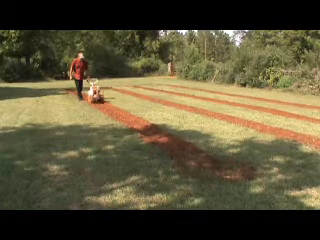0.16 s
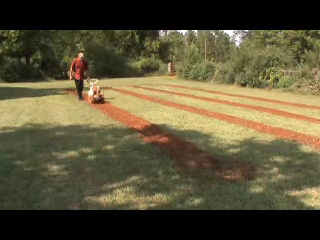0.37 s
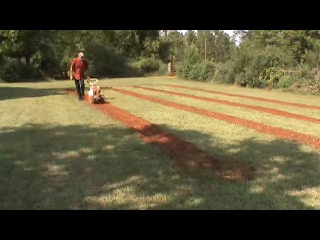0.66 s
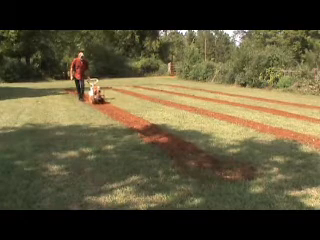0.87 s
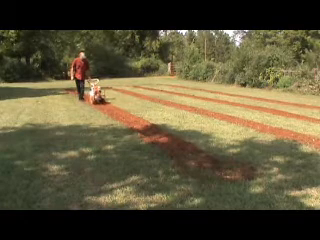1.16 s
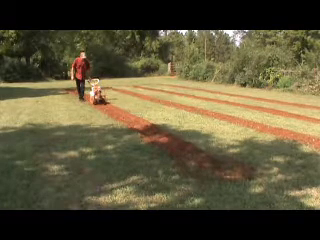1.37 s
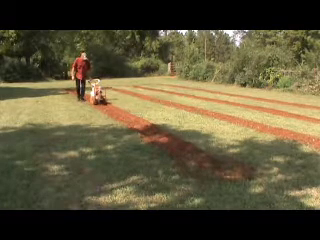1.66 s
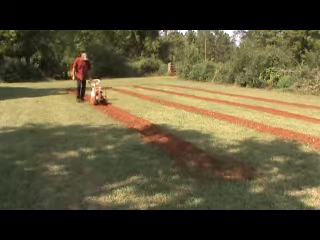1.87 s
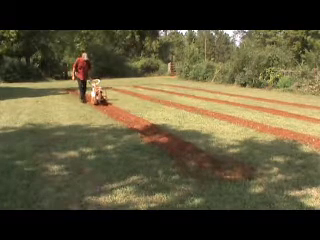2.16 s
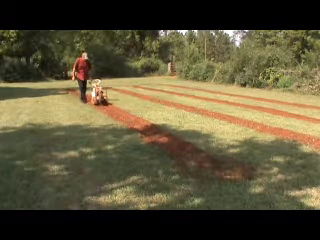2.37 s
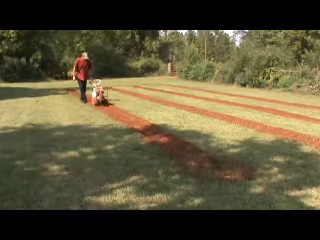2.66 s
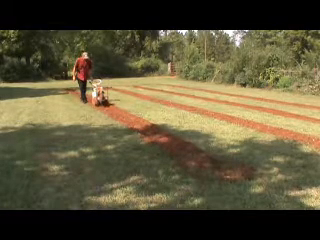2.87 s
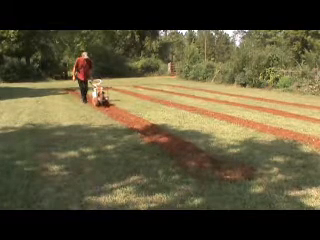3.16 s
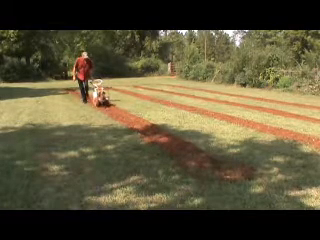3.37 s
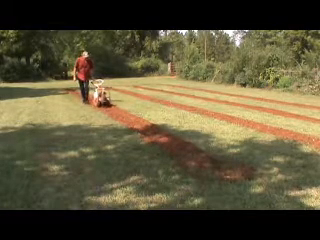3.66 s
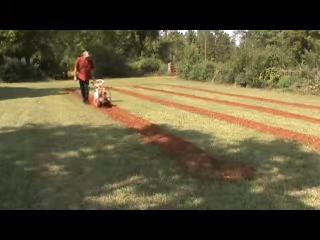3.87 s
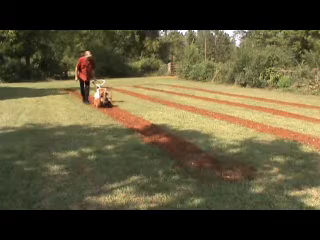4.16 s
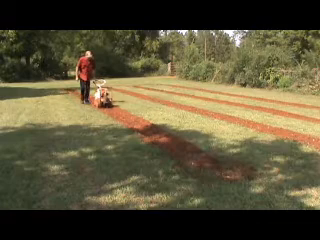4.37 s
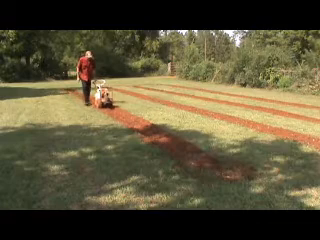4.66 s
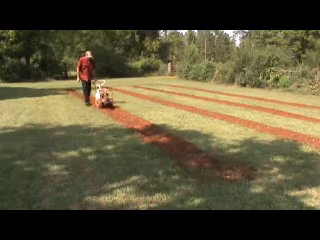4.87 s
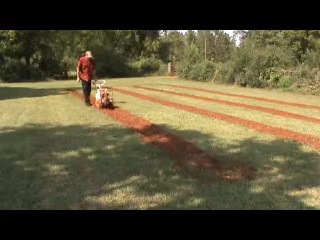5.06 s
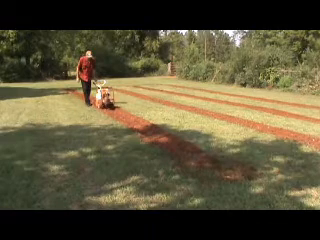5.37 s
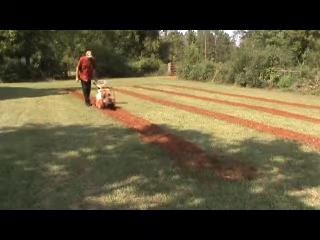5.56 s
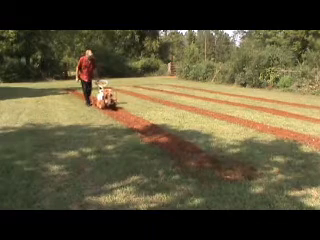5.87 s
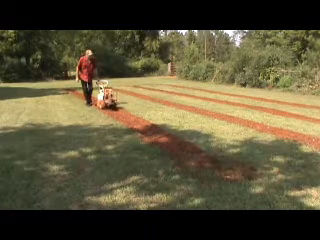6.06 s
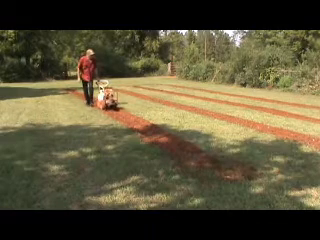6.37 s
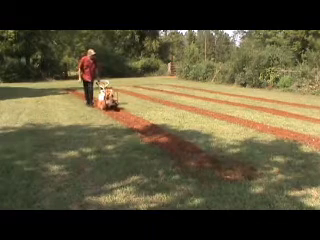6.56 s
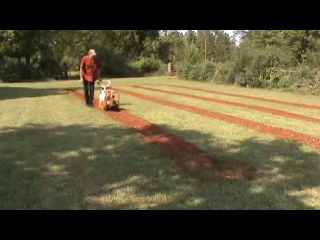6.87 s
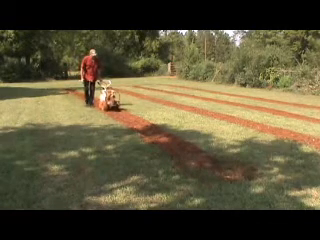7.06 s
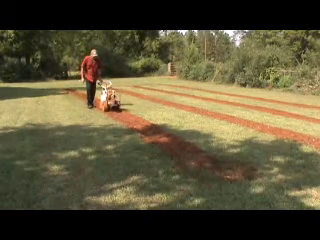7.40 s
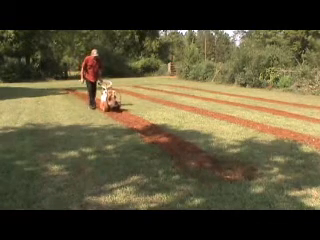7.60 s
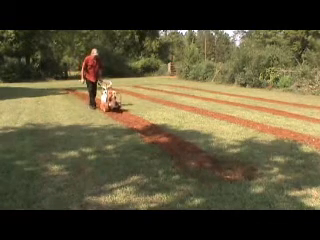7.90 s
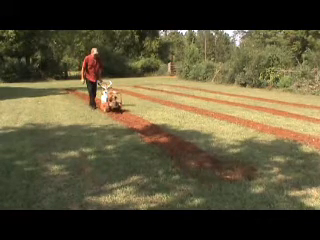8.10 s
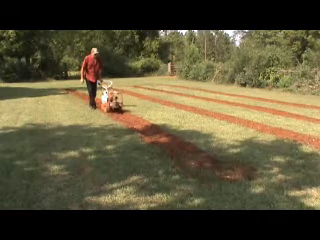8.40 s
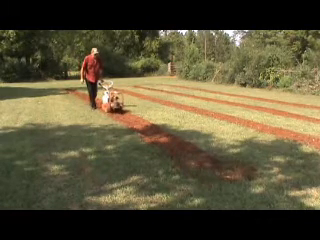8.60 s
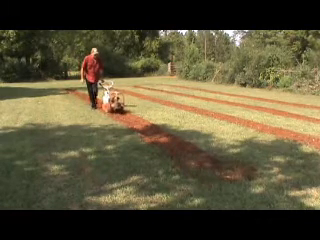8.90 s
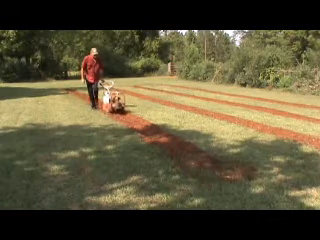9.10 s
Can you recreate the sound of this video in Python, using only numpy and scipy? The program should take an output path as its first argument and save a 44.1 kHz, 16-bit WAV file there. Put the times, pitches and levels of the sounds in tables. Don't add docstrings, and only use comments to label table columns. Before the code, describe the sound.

A small one-cylinder garden tiller putters steadily under load on an open lawn, metal rattling and soil churning as it slowly comes closer.

```python
import sys
import numpy as np
from scipy import signal
from scipy.fft import rfft, irfft, next_fast_len
from scipy.io import wavfile
from scipy.ndimage import uniform_filter1d

SR = 44100
rng = np.random.default_rng(int(sys.argv[2]) if len(sys.argv) > 2 else 0)


def boost_factor(decibels):
    exponent = np.asarray(decibels, float) / 20
    return 10 ** exponent


def generate_wav(sig):
    pcm = np.round(np.clip(np.atleast_2d(sig).T, -1, 1) * 32767).astype(np.int16)
    wavfile.write(sys.argv[1], SR, pcm)


N = 407484
TIME = np.arange(N) / SR
SIZE = next_fast_len(N + SR // 2)
BINS_HZ = np.maximum(np.arange(SIZE // 2 + 1) * SR / SIZE, 1)


def in_pitch(rows):
    hz, *columns = np.transpose(rows)
    return [np.interp(np.log(BINS_HZ), np.log(hz), c) for c in columns]


def rms_one(x):
    return x / np.sqrt(np.mean(x ** 2) + 1e-20)


def filtered(x, response):
    return irfft(rfft(x, SIZE) * response, SIZE)[..., :N]


def drift(rate):
    knots = rng.standard_normal(int(N / SR * 40) + 2)
    memory = np.exp(-2 * np.pi * rate / 40)
    wander = rms_one(signal.lfilter([1], [1, -memory], knots))
    return np.interp(TIME * 40, np.arange(len(knots)), wander)


def nearing(start_db, share):
    return start_db - share * 20 * np.log10(1 - .45 * TIME / 16)


# time in seconds, speed in cycles per second.
SPEED = [(0.0, 25.426), (1.05, 25.928), (1.55, 25.692), (1.7, 26.113), (2.05, 25.472), (2.95, 26.127),
         (3.1, 25.206), (3.3, 26.145), (3.7, 25.727), (4.55, 25.716), (5.85, 25.896), (6.0, 25.783),
         (7.0, 25.616), (7.15, 25.88), (8.05, 25.088), (8.3, 25.908), (8.8, 25.562), (9.24, 25.718)]


def engine_turns():
    s, cycles_per_s = np.transpose(SPEED)
    return np.cumsum(np.interp(TIME, s, cycles_per_s)) / SR - .619


# share of the cycle, relative pressure, width in ms.
PUFFS = [
    (.26, -.15, 1.9),
    (.36, .03, 1.8),
    (.47, -.05, 1.5),
    (.545, .09, 1.5),
    (.855, -.042, 1.5),
]


def muffler(turns, spread_db, cut_hz):
    cycle = np.floor(turns)
    row = cycle.astype(int) + 1
    late, burn_db = JITTER[row, 0], BURN_DB[row]
    out = 0
    for share, pressure, width_ms in PUFFS:
        timing, strength = rng.standard_normal((2, len(BURN_DB)))[:, row]
        ms = (turns - cycle - share) / .02575 + .15 * timing - .25 * late
        u = ms / width_ms
        out = out + pressure * boost_factor(spread_db * strength + burn_db) * (1 - u ** 2) * np.exp(-u ** 2 / 2)
    return rms_one(filtered(out, 1 / np.sqrt(1 + (cut_hz / BINS_HZ) ** 6)))


def crank(turns):
    return np.sqrt(2) * boost_factor(.8 * drift(4)) * np.sin(4 * np.pi * turns + 1.2)


# share of the cycle, then levels in dB of the blow
CONTACTS = [
    (-.004, 0, -12, -14, -7),
    (.045, -20, -2, -6, 0),
    (.21, -15, -14, -5, -3),
    (.29, -18, -10, 0, -9),
    (.47, -11, 0, -10, -10),
    (.6, -16, -12, -9, -12),
    (.81, -22, -12, -8, -19),
    (.89, -24, -16, -6, -22),
]
CYCLES = 245
BURN_DB = .7 * rng.standard_normal(CYCLES)
JITTER = rng.standard_normal((CYCLES, 1)) + .4 * rng.standard_normal((CYCLES, len(CONTACTS)))


def strikes(turns, levels_db, jitter_ms, spread_db):
    cycles = np.arange(-1, int(turns[-1]) + 1)[:, None]
    chance = rng.standard_normal((len(cycles), len(CONTACTS)))
    at = np.interp(cycles + np.array(CONTACTS)[:, 0], turns, TIME, left=np.nan, right=np.nan)
    at = (at + JITTER[:len(cycles)] * jitter_ms / 1000) * SR
    good = (at >= 0) & (at < N)
    heights = boost_factor(levels_db + BURN_DB[:len(cycles), None] + spread_db * chance)
    clicks = np.zeros(N)
    np.add.at(clicks, at[good].astype(int), heights[good])
    return clicks


def ring(clicks, hz, t60):
    r, w = boost_factor(-60 / (t60 * SR)), 2 * np.pi * hz / SR
    return signal.lfilter([0, np.sin(w)], [1, -2 * r * np.cos(w), r * r], clicks + 1e-18)


def metal(turns, modes, column, spread_db, rattle_db, in_step=False):
    rattles_per_s = 1500
    out = 0
    for k, (hz, level_db, t60) in enumerate(modes):
        clicks = strikes(turns, np.array(CONTACTS)[:, column], jitter_ms=.25, spread_db=spread_db)
        hits = rng.standard_normal(N) * (rng.random(N) < rattles_per_s / SR)
        loose = boost_factor(rattle_db + .5 * drift(2.1)) * hits
        sign = -1 if in_step else (-1) ** k
        out = out + sign * boost_factor(level_db) * ring(clicks + loose, hz, t60)
    return rms_one(out)


# mode in Hz, level in dB, T60 in seconds.
HEAD = [(2144, -9, .035), (2380, 1, .028), (2535, -4.5, .045), (3065, -11, .06), (4090, -16, .05),
        (4610, -9, .025), (4928, -11, .04), (5720, -16, .02)]


def head(turns):
    return metal(turns, HEAD, column=1, spread_db=.5, rattle_db=-31)


# mode in Hz, level in dB, T60 in seconds.
PIPE = [(311.6, -11, 0.13), (392.1, -4.5, 0.29), (441, 1, 0.082), (816.4, -6.5, 0.21), (954, -5.5, 0.091),
        (1131, 3.5, 0.051), (1258, -2.5, 0.098)]


def pipe(turns):
    return metal(turns, PIPE, column=2, spread_db=1.8, rattle_db=-20, in_step=True)


# mode in Hz, level in dB, T60 in seconds.
COVERS = [(1386, 2, 0.029), (1491, 1.5, 0.041), (1634, -11.5, 0.072), (1998, -10, 0.088)]


def covers(turns):
    return metal(turns, COVERS, column=3, spread_db=0, rattle_db=-16)


# mode in Hz, level in dB, T60 in seconds.
FINS = [(3705, 0, 0.06), (3785, 0, 0.05)]


def fins(turns):
    facing_db, away_db, swing_s = -31, -14, 3.2
    level_db = facing_db + away_db * np.exp(-TIME / swing_s)
    return boost_factor(level_db) * metal(turns, FINS, column=4, spread_db=2, rattle_db=-25)


# mode in Hz, level in dB, T60 in seconds.
VALVE = [(3066, -5.5, 0.014), (3346, -5, 0.051)]


def valve(turns):
    levels_db = np.where(np.arange(len(CONTACTS)) == 2, 0, -14.0)
    out = 0
    for hz, db, t60 in VALVE:
        clicks = strikes(turns, levels_db, jitter_ms=.4, spread_db=1.5)
        out = out + boost_factor(db) * ring(clicks, hz, t60)
    return rms_one(out)


# frequency in Hz, density in dB per Hz.
HISS = [(900, -9), (1800, -9.5), (2500, -9), (3800, -3), (4000, -4), (5000, -5.5), (6000, -10),
        (7000, -18.5), (8490, -14.5), (11300, -15.5), (12600, -15), (13000, -80)]


def hiss(turns, burst_ms, tail_ms, tail_db):
    clicks = strikes(turns, np.array(CONTACTS)[:, 4], jitter_ms=.25, spread_db=1.5)
    burst = signal.lfilter([1], [1, -np.exp(-1000 / burst_ms / SR)], clicks)
    burst = burst * signal.lfilter([1, .6], 1, rng.standard_normal(N))
    rush = boost_factor(tail_db) * np.exp(-(turns % 1) * 18.7 / tail_ms) * rng.standard_normal(N)
    return rms_one(filtered(burst + rush, boost_factor(in_pitch(HISS)[0])))


# time in seconds, peak level in dB.
STONES = [(0.7297, -6), (1.012, -14), (1.3208, -31), (1.3492, -30), (1.5528, -27), (1.8481, -34.5),
          (2.0506, -28), (2.4812, -34), (3.211, -18), (3.7882, -26), (4.7325, -31), (5.3894, -33),
          (5.6595, -28), (5.9594, -36), (6.1194, -33), (6.6607, -28), (7.0932, -19), (7.2812, -25),
          (7.404, -30), (7.9173, -32), (8.033, -20), (9.0394, -31), (9.1725, -21)]


def stones(tick_ms):
    clicks = np.zeros(N)
    for s, db in STONES:
        clicks[int(s * SR)] = boost_factor(db)
    tick = signal.lfilter([1], [1, -np.exp(-1000 / tick_ms / SR)], clicks) * rng.standard_normal(N)
    tick = signal.sosfilt(signal.butter(2, 4000, "high", fs=SR, output="sos"), tick)
    return signal.sosfilt(signal.butter(8, 12600, fs=SR, output="sos"), tick)


# frequency in Hz, density in dB per Hz.
CHURN = [(18, -22), (40, -15), (130, 0), (335, -11.5), (560, -2.5), (690, -8.5), (940, -3), (1500, -3),
         (2400, -1), (3800, -8), (4000, -24.5), (5800, -14.5), (12600, -22), (13000, -60)]


def churn(patchy_db):
    noise = rng.standard_normal((2, N)) * boost_factor(patchy_db * drift(6.6))
    return rms_one(filtered(noise, boost_factor(in_pitch(CHURN)[0])))


# frequency in Hz, left lead in radians, left-right level difference in dB,
# share of scattered sound.
PORTS = [(40, -.2, 1, .3), (90, -.88, .3, .3), (200, -1.12, 0, .5), (500, -1.46, -.5, .3),
         (1100, -1.05, 1, .3), (2400, -.8, .6, .35), (3700, -.7, -1.2, .4), (4600, -.35, -1.5, .4),
         (5600, -.1, -.5, .3), (9000, 0, 0, .15)]


def microphones(direct, scattered):
    lead, balance_db, share = in_pitch(PORTS)
    side = np.array([[1], [-1]])
    ports = boost_factor(side * balance_db / 2) * np.exp(.5j * side * lead)
    return filtered(direct, ports) + filtered(side * scattered, ports * share)


def scene():
    turns = engine_turns()
    low_db, cover_db = nearing(-23.5, .27), nearing(-26.5, .72)
    head_db, hiss_db = nearing(-22.5, -.67), nearing(-35, 1)
    valve_db = nearing(-33, -3.2)
    lull_db = -2.5 * (turns % 1) ** 2
    rush, scatter = churn(patchy_db=.63)
    direct = boost_factor(low_db - .92) * muffler(turns, spread_db=-.1, cut_hz=113)
    direct += boost_factor(low_db - 17) * crank(turns)
    direct += boost_factor(head_db - 3) * head(turns)
    direct += boost_factor(cover_db - 2.5) * pipe(turns)
    direct += boost_factor(cover_db - 4) * covers(turns)
    direct += fins(turns)
    direct += boost_factor(valve_db) * valve(turns)
    direct += boost_factor(hiss_db + 9.5) * hiss(turns, burst_ms=3.9, tail_ms=81, tail_db=-2.5)
    direct += boost_factor(-9) * stones(tick_ms=1.1)
    direct += boost_factor(cover_db + 3.5 + lull_db) * rush
    return microphones(direct, boost_factor(cover_db + 5) * scatter)


def housing(x):
    notch = boost_factor(-6 * np.exp(-((BINS_HZ - 6376) / 243) ** 2 / 2))
    top = 1 / np.sqrt(1 + (BINS_HZ / 13000) ** 60)
    bottom = 1 / np.sqrt(1 + (15 / BINS_HZ) ** 4)
    return filtered(x, notch * top * bottom)


def starved(x):
    hz, s, cells = signal.stft(x, SR, window="cosine", nperseg=2048)
    hz = hz[:, None]
    calm = np.abs(s[:, None] - np.array(STONES)[:, 0]).min(axis=1) > .012
    by_notch = (hz > 6300) * np.clip((7900 - hz) / 1000, 0, 1)
    at_top = np.clip((hz - 11200) / 1000, 0, 2)
    top_db = 3 + 1.3 * np.interp(s, TIME, drift(3.8))
    notch_db = 1 + .55 * s + 1.3 * np.interp(s, TIME, drift(2.8))
    threshold_db = -62 + .3 * s + rng.standard_normal(len(s)) + by_notch * notch_db + at_top * top_db
    weak = uniform_filter1d(np.abs(cells.mean(axis=0)), size=3) < boost_factor(threshold_db)
    cells = cells * ~(weak & calm & (hz > 5500))
    return signal.istft(cells, SR, window="cosine", nperseg=2048)[1][:, :N]


def band_limit(x):
    return signal.sosfilt(signal.butter(12, 15800, fs=SR, output="sos"), x)


def record(dry):
    mix = starved(housing(dry))
    return band_limit(mix)


dry = scene()
out = record(dry)
generate_wav(out)
```